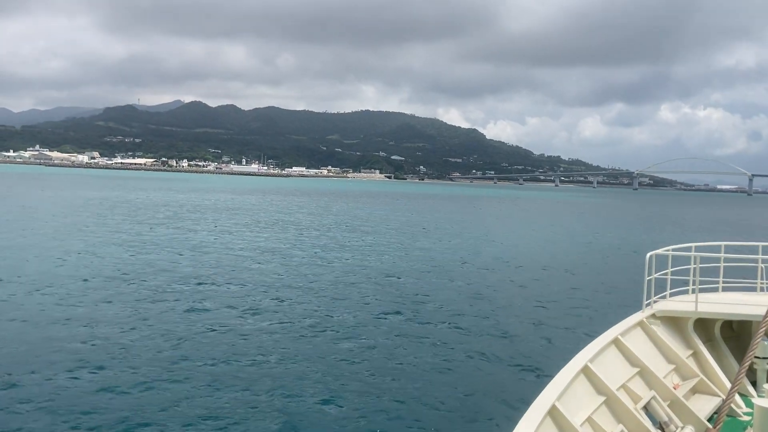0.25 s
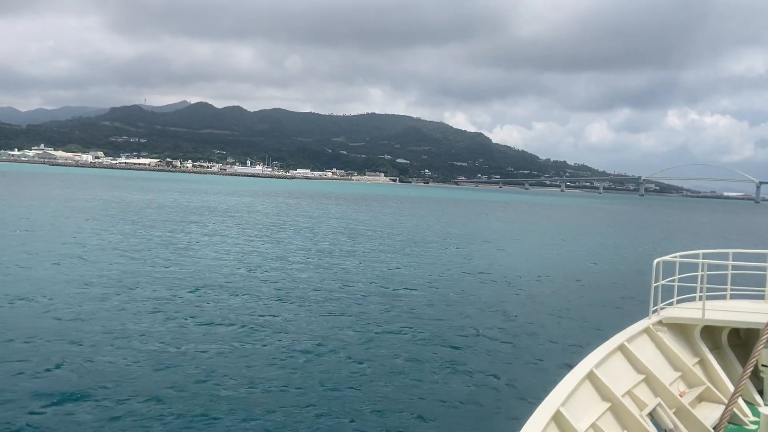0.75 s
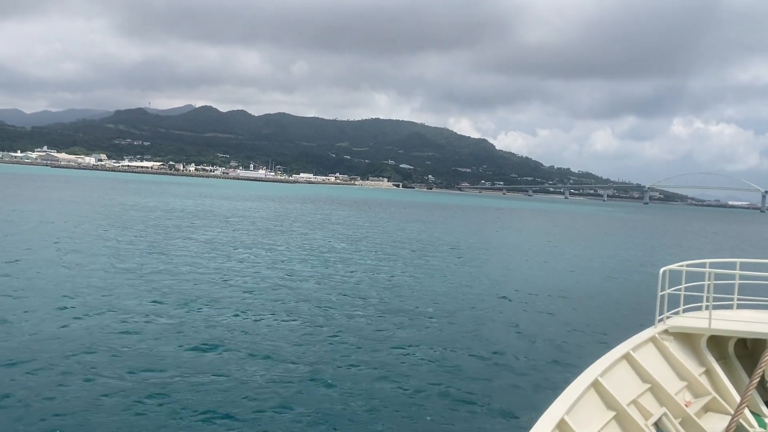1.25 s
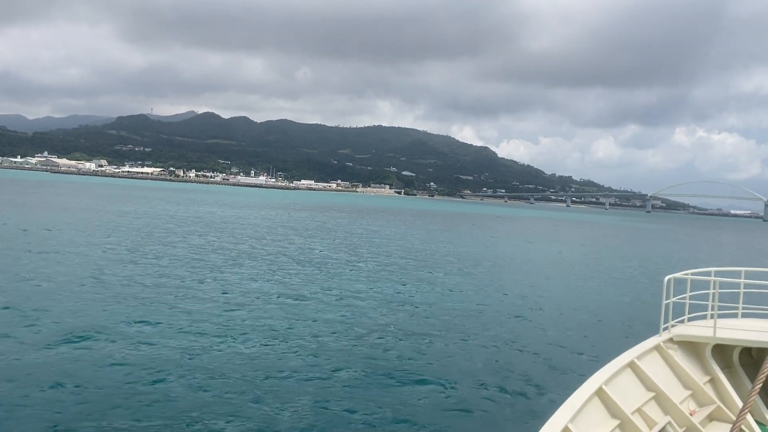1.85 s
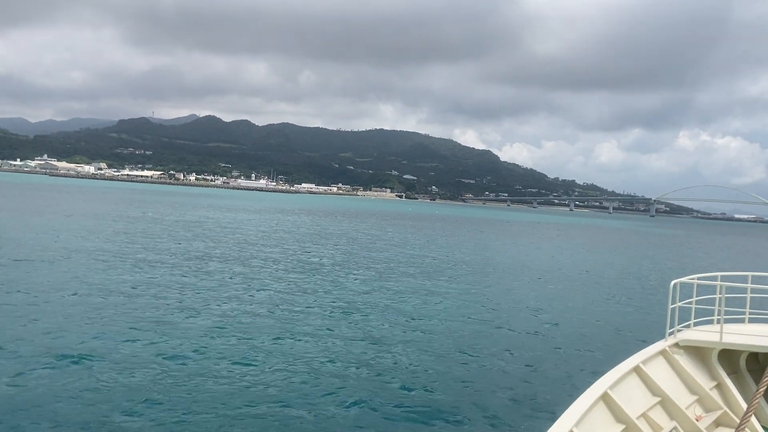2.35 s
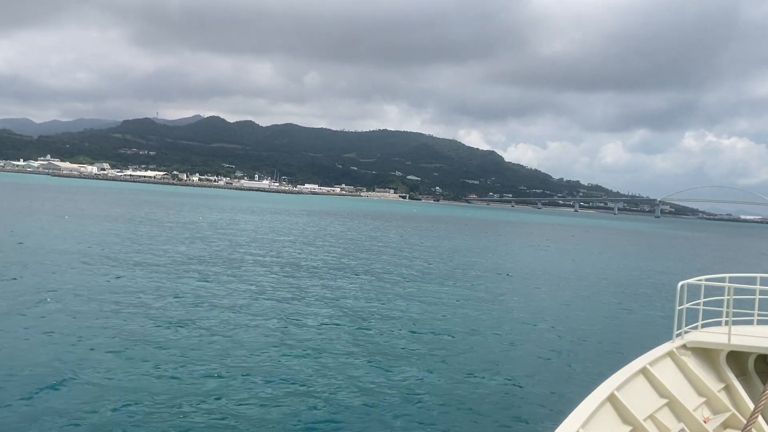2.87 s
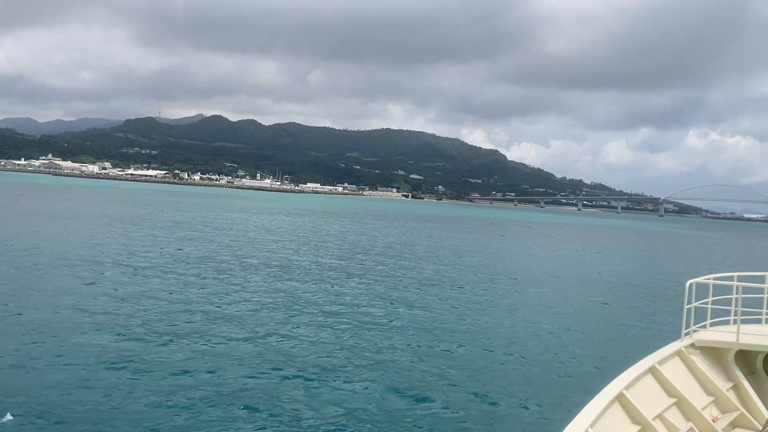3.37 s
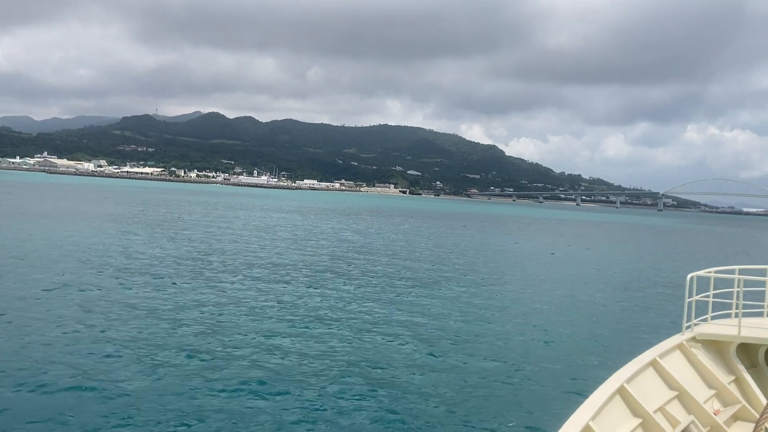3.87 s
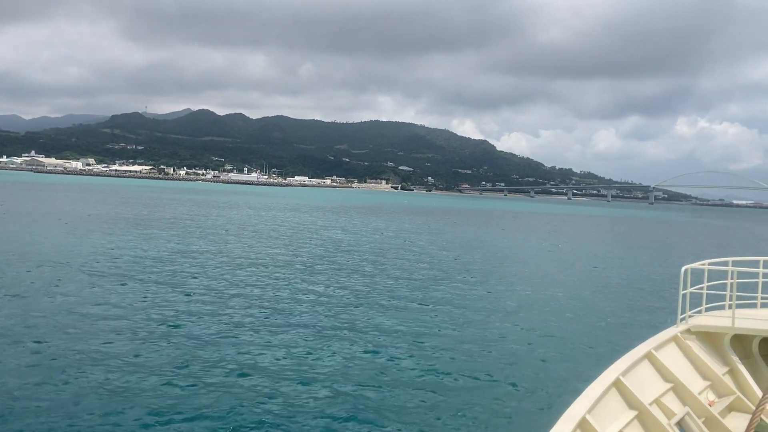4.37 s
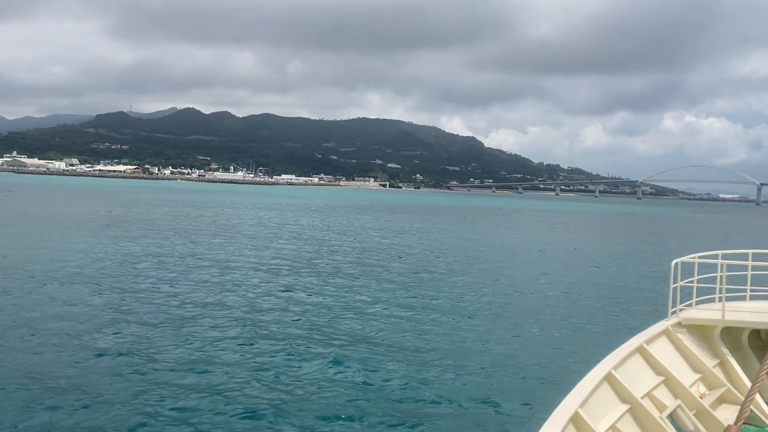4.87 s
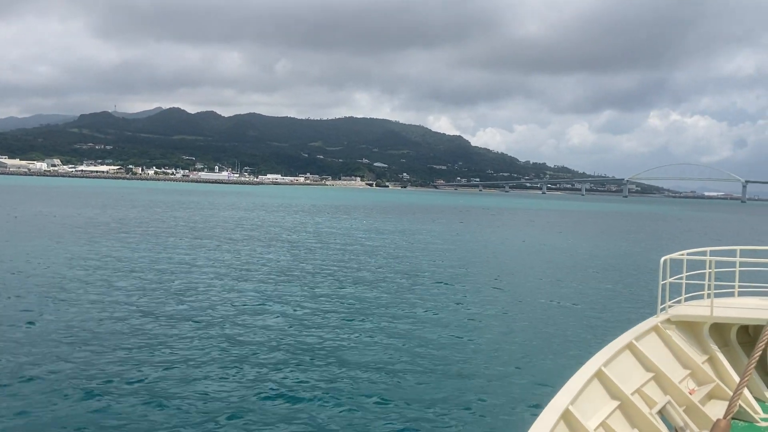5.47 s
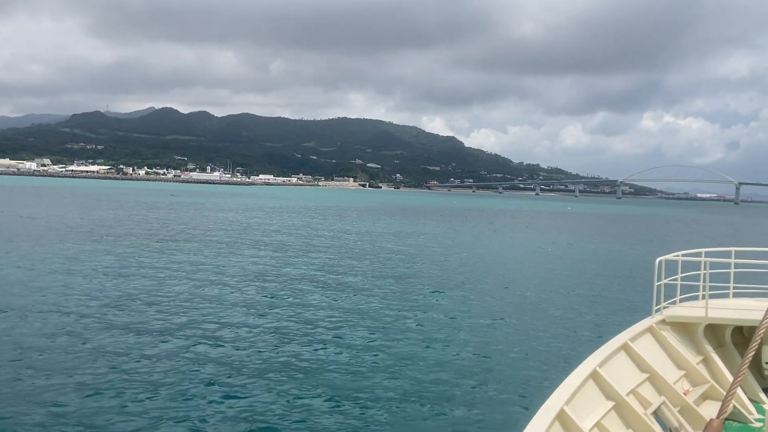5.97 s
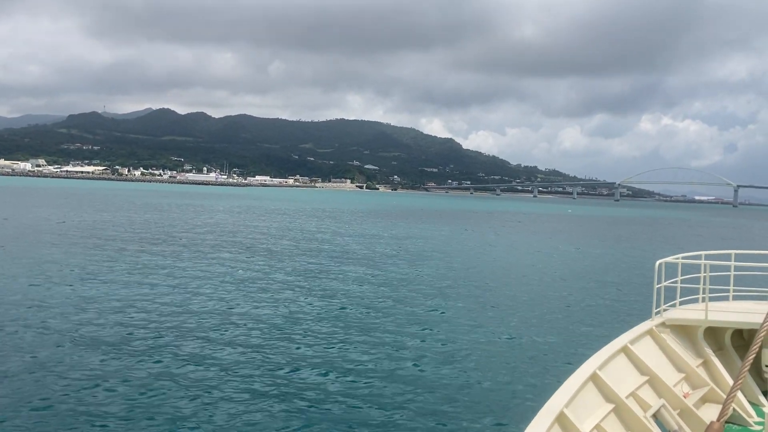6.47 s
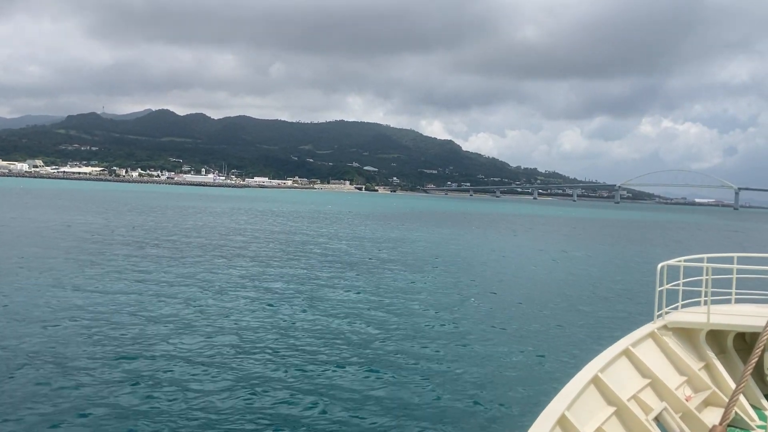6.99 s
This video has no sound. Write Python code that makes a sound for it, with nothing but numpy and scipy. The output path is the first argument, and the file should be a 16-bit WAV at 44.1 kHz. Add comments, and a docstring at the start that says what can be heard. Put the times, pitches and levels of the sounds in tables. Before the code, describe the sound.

Uneven wind roars, rasps and thumps against a phone's microphones on a ferry deck, over low ship drone and hissing sea.

```python
"""Wind blows unevenly across a phone's microphones on the deck of a moving ferry: noise, shaped in time and pitch.
Gusts roar and rasp at the ports, big eddies rumble and boom, and single buffets thump and crackle.
Underneath run the ship's steady drone, a dull rush with wavering sine tones,
and the swelling hiss of the sea, noise that follows a swell."""
import sys
import numpy as np
from scipy import signal
from scipy.fft import rfft, irfft
from scipy.io import wavfile
from scipy.ndimage import uniform_filter1d

SR = 44100
rng = np.random.default_rng(int(sys.argv[2]) if len(sys.argv) > 2 else 0)


def to_wav(sig):
    """Store sig (one row per channel, or 1-D mono) as 16-bit WAV at the path in sys.argv[1].

    Samples outside -1..1 are clipped; the rate is SR.
    """
    pcm = np.clip(np.atleast_2d(sig), -1, 1) * 32767
    pcm = np.round(pcm).astype(np.int16)
    wavfile.write(sys.argv[1], SR, pcm.T)  # frames by channels


N = 318843
TIME = np.arange(N) / SR  # s
FREQ = np.maximum(np.arange(N // 2 + 1) * SR / N, 1)  # Hz

# Relative noise spectra. Each row: frequency in Hz, density in dB.
SHIP_COLOUR = [(25, -5), (55, 7.5), (120, -4), (200, -13), (350, -7), (600, -13.5), (1000, -40),
               (1600, -35), (2500, -39), (5000, -90)]
WASH_COLOUR = [(600, -1.5), (1500, 5), (2200, 3.5), (3000, 2), (4300, 0), (5600, -4.5), (6300, -5),
               (7000, -58), (15000, -74)]
SPRAY_COLOUR = [(4000, -29), (6000, -11.5), (6900, -4), (9000, -4.5), (11500, -0.5), (13500, -0.5),
                (15500, -7)]
RUMBLE_COLOUR = [(22, -44), (31, -29), (45, -6.5), (65, 1), (120, -1.5), (180, -6.5), (280, -13.5),
                 (600, -26)]
TICK_COLOUR = [(800, -4), (1800, 0), (3200, -2), (4500, -6), (6000, -15)]
CRACKLE_COLOUR = [(800, -30), (1600, 10), (2400, -0.5), (4000, -12.5), (5500, -30), (7500, -37)]
GUST_COLOUR = [(60, -27), (140, -0.5), (230, 1), (380, 0.5), (560, -1), (720, -4.5), (1000, -26.5),
               (1600, -26), (3000, -70)]
RASP_COLOUR = [(350, -26), (650, 7), (850, 3.5), (1100, 3), (1450, -3), (1800, -5.5), (2300, -8),
               (3200, -24), (6000, -48)]

# Steady tones of the machinery. Each row: pitch in Hz, rms level in dB.
HUM = [(59.2, -37), (120, -51), (156, -45), (208, -45.5)]
# Swell of the sea along the hull. Each row: time in seconds, swell in dB.
SWELL = [(0.0, -51), (0.16, -51.5), (0.38, -53), (0.86, -49.5), (0.97, -54.5), (1.37, -57), (1.89, -50),
         (2.09, -52.5), (2.44, -48), (2.64, -53.5), (3.12, -53.5), (3.36, -50.5), (4.87, -51), (5.01, -46),
         (5.19, -52.5), (5.32, -47.5), (5.62, -47), (5.86, -53), (6.4, -48), (6.48, -46), (6.68, -45.5),
         (7.23, -48)]
# Water washing along the hull. Each row: time in seconds, level at the mean swell in dB.
WASH = [(0.0, -46), (1.3, -45.5), (2.4, -46.5), (3.6, -45), (4.4, -44.5), (4.9, -46.5), (6.2, -43.5),
        (7.23, -43)]
# Deep rumble between gusts. Each row: time in seconds, level in dB.
RUMBLE = [(0.0, -23.5), (0.45, -31), (1.4, -24.5), (2.3, -24.5), (2.8, -23.5), (3.7, -25), (5.1, -24.5),
          (6.75, -23.5), (7.23, -23.5)]
# Sharp cracks of air at the ports. Each row: time in seconds, level in dB, decay in seconds, upper edge in Hz.
SNAPS = [(0.004, -20, 0.0018, 2000), (0.0735, -30, .001, 3200), (1.171, -33.5, .0008, 5000),
         (1.291, -35, .0006, 5000), (2.603, -29, .002, 1900), (2.649, -28, .003, 2200),
         (2.6595, -29, 0.0022, 2500), (2.8197, -25, .0006, 4000), (2.8342, -17.5, 0.0024, 2150),
         (2.835, -32, 0.00055, 6500), (2.843, -23, 0.0022, 2300), (2.849, -25, 0.0024, 2000),
         (2.853, -26, 0.0018, 2300), (2.8695, -24.5, .003, 2470), (2.8765, -31, .002, 2500),
         (2.9305, -27, .002, 2200), (4.974, -25, .001, 2800), (5.692, -25.5, 0.0028, 1900),
         (5.705, -23, .003, 2100), (6.199, -24, 0.0022, 1700), (6.2046, -20, .0015, 2300),
         (6.2318, -21, .002, 1800), (6.238, -23, 0.0027, 2100), (6.682, -27, .0015, 3000),
         (6.8240, -15, .003, 1780), (6.8287, -16, .002, 1870)]
# Single eddies that hit the ports. Each row: time in seconds, roar in dB, thump in dB, crackle in dB.
BUFFETS = [(0.008, -12, -27, -39), (0.025, -14, -28, -34), (0.092, -15.5, -12, -50),
           (0.163, -13.5, -11.5, -40), (0.281, -14, -17, -39), (0.607, -19, -21, -56),
           (0.686, -21, -8, -52), (0.748, -17, -13, -54), (0.84, -16.5, -21, -51), (1.41, -17.5, -15, -40),
           (1.874, -24.5, -7.5, -46), (2.063, -24, -18, -61), (2.54, -21, -14, -50),
           (2.604, -10.5, -12, -34), (2.659, -19, -29, -35), (2.819, -16, -26, -38), (2.842, -12, -15, -41),
           (2.849, -15, -6.5, -40), (2.878, -8.5, -13.5, -36), (2.932, -12.5, -19, -35),
           (3.233, -28, -9, -39), (3.268, -17, -33, -42), (3.521, -20.5, -19, -35), (3.697, -18, -23, -50),
           (3.781, -15.5, -26, -44), (3.825, -13, -26, -40), (3.93, -12.5, -28, -54),
           (3.962, -18, -30, -46), (3.981, -11, -38, -43), (4.132, -21, -29, -48), (4.165, -21, -21, -53),
           (4.339, -18, -11, -39), (4.371, -17, -21, -44), (4.517, -12.5, -34, -50), (4.941, -7, -32, -37),
           (4.982, -13, -11.5, -37), (5.152, -12.5, -27, -43), (5.201, -8, -33, -33),
           (5.262, -26, -36, -38), (5.281, -29, -34, -28), (5.303, -18, -30, -33), (5.331, -20, -34, -33),
           (5.435, -12.5, -28, -39), (5.699, -12.5, -8, -29), (5.868, -15, -31, -35.5),
           (5.934, -17, -12.5, -38), (6.202, -14, -10, -38), (6.24, -19, -27, -32), (6.647, -17, -25, -35),
           (6.692, -19, -5, -37), (6.724, -17.5, -26, -39), (6.747, -30, -6, -37), (6.783, -28, -24, -33),
           (6.831, -9.5, -10, -42), (7.102, -20, -12, -36), (7.154, -16, -18, -39)]
# Big eddies that boom at the ports. Each row: start in seconds, hold in seconds, pitch in Hz, level in dB.
BOOMS = [(0.0, 0.11, 168, -18), (0.306, 0.023, 199, -19.5), (0.65, 0.032, 129, -24.5),
         (2.667, 0.054, 62, -20), (2.816, .055, 62, -17), (4.946, 0.06, 68, -26),
         (6.198, 0.075, 66.4, -18.5), (6.675, 0.115, 62, -23.5), (6.82, 0.023, 128, -12)]
# Air stream between gusts. Each row: time in seconds, strength against the usual in dB.
WIND = [(0.0, 8), (0.22, 1), (0.75, 3.5), (1.65, -3.5), (1.76, -9), (2.55, -7.5), (2.62, 4.5), (3.1, 4.5),
        (3.42, -3.5), (4.18, 6.5), (4.45, 9.5), (4.9, 4), (5.35, 7.5), (5.6, 1), (6.02, -1), (6.3, -5),
        (6.6, -3), (7.23, -1.5)]
# Gusts. Each row: start in seconds, hold in seconds, roar in dB, rasp against roar in dB.
GUSTS = [(0.0, 0.07, -22, -15), (0.095, 0.074, -23, -15), (0.258, 0.055, -24, -2), (0.44, 0.095, -23, -7),
         (0.598, 0.0092, -23.5, 3), (0.639, 0.067, -21.5, 1), (0.735, 0.013, -18, 2),
         (0.824, 0.018, -30, 2.5), (0.91, 0.023, -27.5, 1), (0.966, 0.044, -27.5, -4.5),
         (1.365, 0.028, -30, 1.5), (2.587, 0.045, -19, -19), (2.64, 0.029, -16.5, -8),
         (2.692, 0.051, -24.5, 3.5), (2.78, 0.02, -14.5, -14), (2.834, 0.077, -18.5, -2),
         (2.982, 0.097, -22, 1.5), (3.09, 0.061, -21, -6.5), (3.222, 0.074, -23.5, -3.5),
         (3.608, 0.042, -22, 0.5), (3.772, 0.044, -38, 1), (3.912, 0.069, -25, 3.5),
         (4.031, 0.036, -21, -5), (4.113, 0.051, -17, -11), (4.263, 0.073, -22, -4), (4.36, 0.057, -21, -6),
         (4.637, 0.038, -30, 3), (4.779, 0.053, -31, 7.5), (4.934, 0.13, -22.5, 0.5),
         (5.133, 0.099, -24, 5.5), (5.242, 0.096, -21, -1), (5.38, .012, -26.5, 1),
         (5.439, 0.049, -20.5, -8), (5.67, 0.012, -17, -7), (5.684, 0.015, -18.5, -0.5),
         (5.815, 0.06, -21.5, -6), (6.187, 0.023, -15.5, -6), (6.23, 0.0098, -21.5, 6.5),
         (6.63, 0.03, -16, -11), (6.675, 0.12, -20.5, -7.5), (6.795, 0.05, -18, -11),
         (7.034, 0.069, -22.5, -6.5)]
# Brief lulls between gusts. Each row: middle in seconds, length in seconds, gain change in dB.
LULLS = [(0.216, 0.051, 0.5), (0.397, 0.05, -3.5), (0.576, 0.046, -7), (0.761, 0.037, -5.5),
         (0.881, 0.03, -7), (1.082, 0.047, -5.5), (1.222, 0.069, -4.5), (2.58, 0.014, -4),
         (2.762, 0.034, -6.5), (2.806, 0.015, -7), (2.955, 0.03, -4.5), (3.385, 0.044, -5.5),
         (3.755, 0.029, -6), (3.81, .022, -3), (3.945, 0.019, -5), (4.103, .022, -1), (4.184, 0.034, -17),
         (4.247, 0.02, -2.5), (4.91, 0.042, -6), (5.137, 0.029, -6), (5.41, 0.039, -4),
         (5.587, 0.087, -5.5), (5.665, 0.014, -5), (5.774, .07, -5)]
# Upper edge of the turbulence. Each row: time in seconds, edge in Hz.
EDGE = [(0, 1660), (0.55, 1450), (0.8, 1520), (0.98, 1790), (2.6, 1640), (2.72, 1770), (2.93, 1750),
        (3.0, 1310), (3.07, 1520), (3.15, 1800), (3.3, 1620), (3.62, 1330), (3.8, 1560), (3.95, 1370),
        (4.28, 1330), (4.45, 1880), (4.6, 1380), (4.78, 1340), (4.95, 1740), (5.15, 1610), (5.3, 1780),
        (5.5, 1580), (5.7, 1660), (6.79, 1570), (7.23, 1550)]
# Right channel against left. Each row: frequency in Hz, phase lag in radians, likeness 0-1, left minus right in dB.
PORTS = [(190, 0.14, 0.91, 0.5), (294, 2.84, 0.79, 1), (401, 4.63, 0.62, -0.5), (516, 5.83, 0.75, -1),
         (744, 9.63, 0.86, 0), (1004, 12.97, 0.53, 2), (1148, 15.17, 0.8, 3), (1266, 17.95, 0.42, 2),
         (1590, 20.06, 0.87, 2.5), (2020, 19.2, 0.11, 0), (4300, 31, 0.1, 0), (5450, 17, 0.47, -2.5)]
# Crossover below which the channels merge. Each row: time in seconds, crossover in Hz.
MONO_BELOW = [(0, 535), (2, 600), (3.7, 560), (4.1, 404), (4.5, 282), (5, 204), (5.9, 157), (6.4, 223),
              (6.8, 393), (7.2, 415)]

WASH_GROWTH = 0.43  # dB per dB of swell
SPRAY_DB, SPRAY_LAG_MS = 4.5, .2233  # level against the swell; lag of the left channel
TICK_GROWTH = 0.3  # dB per dB of rasp
BUFFET_RASP_DB = -10.5  # against its roar
ROAR_DB, ROAR_GROWTH = -27.5, 0.79  # at usual wind; dB per dB of wind
RASP_DB, RASP_GROWTH = -31, 1  # likewise
GUST_ATTACK_S, GUST_RELEASE_S = 0.0071, 0.0086
GUST_RUMBLE_DB = -6  # against the gust's roar
DEEP_HZ, DEEP_SHIFT = 406, 0.27  # split of the roar; exponent of its tilt with dullness
TOP_HZ = 15800


def undb(db):
    """Decibels to gain."""
    return 10 ** (np.asarray(db) / 20)


def curves(table):
    """The columns of a time table, sample by sample."""
    s, *columns = np.transpose(table)
    return [np.interp(TIME, s, c) for c in columns]


def spectra(table):
    """The columns of a frequency table, bin by bin, on a log frequency axis."""
    hz, *columns = np.transpose(table)
    return [np.interp(np.log(FREQ), np.log(hz), c) for c in columns]


def noise(colour):
    """Two unrelated noises of rms 1 with this spectrum, falling steeply beyond its ends."""
    skirts = np.minimum(FREQ / colour[0][0], 1) ** 3 * np.minimum(colour[-1][0] / FREQ, 1) ** 3
    spectrum = rfft(rng.standard_normal((2, N))) * undb(spectra(colour)[0]) * skirts
    x = irfft(spectrum, N)
    return x / x.std()


def flutter(rate_hz, depth_db):
    """A gain of mean power 1 that wanders at random, mostly slower than half the rate."""
    wander = irfft(rfft(rng.standard_normal(N)) / (1 + (2 * FREQ / rate_hz) ** 4), N)
    gain = undb(depth_db * np.clip(wander / wander.std(), -2.5, 2.5))
    return gain / np.sqrt(np.mean(gain ** 2))


def puff(age_s, rise_s, fall_s):
    """An envelope that swells to 1 at age 0 and dies away exponentially."""
    return np.exp(-np.where(age_s < 0, (age_s / rise_s) ** 2, age_s / fall_s))


def surge(start_s, hold_s):
    """The envelope of a gust: quick attack, hold, release."""
    age_s = TIME - start_s
    attack = np.clip(age_s / GUST_ATTACK_S + .5, 0, 1)
    return attack * np.exp(-np.clip((age_s - hold_s) / GUST_RELEASE_S, 0, 20))


def burst(envelope, low_hz, high_hz):
    """Two unrelated bursts of noise between these edges, each with the energy of the envelope."""
    sos = signal.butter(2, [low_hz, high_hz], "band", fs=SR, output="sos")
    x = signal.sosfilt(sos, rng.standard_normal((2, N)) * (envelope + 1e-12))
    return x * np.sqrt(np.sum(envelope ** 2) / np.sum(x ** 2, axis=1, keepdims=True))


def churn(colour, size=600):
    """Turbulent noise whose strength stays even from one hundredth of a second to the next."""
    x = noise(colour)
    power = uniform_filter1d(uniform_filter1d(x ** 2, size), size // 2)
    return x / np.sqrt(power)


def turbulence(x, clump_db=3.0, above_db=-16, size=512):
    """Eddies gather in short clumps of pitch; above a moving edge the sound drops to a lower shelf."""
    hz, s, cells = signal.stft(x, SR, nperseg=size)
    below = 1 / (1 + (hz[:, None] / np.interp(s, *np.transpose(EDGE))) ** 10)
    # smoothed over neighbouring pitches, then times
    clumps = uniform_filter1d(rng.standard_normal(cells.shape), size=3, axis=0)
    clumps = uniform_filter1d(clumps, size=4, axis=1)
    clumps = undb(clump_db * clumps / clumps.std())
    gain = (below + undb(above_db) * (1 - below)) * clumps / np.sqrt(np.mean(clumps ** 2))
    return signal.istft(cells * gain, SR, nperseg=size)[1][:, :N]


def ship():
    """Engines and ventilation: a dull even rush with a few wavering tones."""
    hum = np.zeros(N)
    for hz, db in HUM:
        tone = np.sqrt(2) * np.sin(2 * np.pi * (hz * TIME + rng.random()))
        hum += undb(db) * flutter(rate_hz=5.4, depth_db=2.5) * tone
    return noise(SHIP_COLOUR) * undb(-31.0) + hum


def sea():
    """Water washes along the hull, and its foam hisses in the same slow swells; returns wash and spray."""
    (wash_db,), (swell_db,) = curves(WASH), curves(SWELL)
    wash_gain = undb(wash_db + WASH_GROWTH * (swell_db - swell_db.mean()))
    wash = noise(WASH_COLOUR) * wash_gain * flutter(rate_hz=56, depth_db=1.18)
    spray = noise(SPRAY_COLOUR)[0] * undb(swell_db + SPRAY_DB)
    spray = spray * flutter(rate_hz=220, depth_db=0.5) * flutter(rate_hz=14, depth_db=0.75)
    # spray reaches the left channel later and with opposite sign
    late = -irfft(rfft(spray) * np.exp(-2j * np.pi * FREQ * SPRAY_LAG_MS / 1000), N)
    return wash, np.array([late, spray])


def rumble(gain):
    """Large slow eddies press on the microphones."""
    return noise(RUMBLE_COLOUR) * gain * flutter(rate_hz=22, depth_db=1.0)


def ticks(rasp_gain, count=260, tick_s=0.001, tick_db=-38):
    """The smallest eddies break at the ports in faint ticks, a little louder where the rasp is strong."""
    hits = np.zeros(N)
    hits[(rng.random(count) * N).astype(int)] = undb(tick_db)
    envelope = signal.lfilter([1], [1, -np.exp(-1 / (tick_s * SR))], hits)
    return noise(TICK_COLOUR) * envelope * (rasp_gain / np.median(rasp_gain)) ** TICK_GROWTH


def snaps(low_hz=600):
    """The hardest eddies break on a port with a dry crack: a very short burst of noise."""
    return sum(undb(db) * burst(puff(TIME - s, rise_s=0.0004, fall_s=decay_s), low_hz, edge_hz)
               for s, db, decay_s, edge_hz in SNAPS)


def buffets(thump_hz=110, thump_s=0.0059, snap_ahead_s=0.0025):
    """Each strong eddy crackles, rasps and roars for a moment and leaves one swing of pressure."""
    roar, crackle, thump = np.zeros((3, N))
    for s, roar_db, thump_db, crackle_db in BUFFETS:
        octaves, turn = rng.random(2) - [.5, 0]
        near = np.abs(TIME - s) < .12
        age_s = TIME[near] - s
        roar[near] += undb(roar_db) * puff(age_s, rise_s=0.0068, fall_s=0.0064)
        # the crackle peaks just ahead of the roar
        crackle[near] += undb(crackle_db) * puff(age_s + snap_ahead_s, rise_s=0.009, fall_s=0.015)
        swing = np.sin(2 * np.pi * (thump_hz * 2 ** octaves * age_s + turn))
        thump[near] += undb(thump_db) * np.exp(-(age_s / thump_s) ** 2) * swing
    crackle = crackle * flutter(rate_hz=700, depth_db=3.0)
    air = turbulence(churn(GUST_COLOUR) + undb(BUFFET_RASP_DB) * churn(RASP_COLOUR))
    return thump + roar * air + crackle * churn(CRACKLE_COLOUR)


def booms(spread=1.64, lead_s=0.003):
    """A big eddy makes the air at the ports boom: a surge of noise in a band around one pitch."""
    return sum(undb(db) * burst(surge(start_s - lead_s, hold_s), hz / spread, hz * spread)
               for start_s, hold_s, hz, db in BOOMS)


def lulls():
    """The gain of the air stream, which changes for a moment in each lull, nearly always downwards."""
    gain_db = np.zeros(N)
    for s, length_s, change_db in LULLS:
        gain_db += change_db * np.exp(-np.minimum(np.abs(2 * (TIME - s) / length_s), 10) ** 4)
    return undb(gain_db)


def airflow():
    """Gusts add power to the wandering stream and lulls scale it; returns gains of rumble, roar and rasp."""
    (wind_db,), (rumble_db,) = curves(WIND), curves(RUMBLE)
    eddying = flutter(rate_hz=20, depth_db=0.68)
    # powers, so that gusts add without regard to phase
    low = (undb(rumble_db) * flutter(rate_hz=25.0, depth_db=0.3)) ** 2
    roar = (undb(ROAR_DB + ROAR_GROWTH * wind_db) * eddying) ** 2
    rasp = (undb(RASP_DB + RASP_GROWTH * wind_db) * eddying) ** 2
    for start_s, hold_s, roar_db, bright_db in GUSTS:
        power = (undb(roar_db) * surge(start_s, hold_s)) ** 2
        low = low + power * undb(GUST_RUMBLE_DB) ** 2
        roar = roar + power
        rasp = rasp + power * undb(bright_db) ** 2
    calm = lulls()
    return np.sqrt(low), np.sqrt(roar) * calm, np.sqrt(rasp) * calm


def gusts(roar_gain, rasp_gain):
    """Air roars and rasps at the ports; the same eddies chop both, and dull air roars deeper."""
    eddies = flutter(rate_hz=126, depth_db=1.24)
    stream = churn(GUST_COLOUR)
    deep = irfft(rfft(stream) / (1 + (FREQ / DEEP_HZ) ** 6), N)
    dullness = roar_gain / rasp_gain
    lean = (dullness / np.median(dullness)) ** DEEP_SHIFT
    tilted = deep * lean + (stream - deep) / lean
    roar = tilted * roar_gain * flutter(rate_hz=370, depth_db=2.0)
    rasp = churn(RASP_COLOUR) * rasp_gain * flutter(rate_hz=620, depth_db=2.0)
    return turbulence(eddies * (roar + rasp))


def ports(pair):
    """The right channel hears a lagging share of the left one's sound, plus sound of its own."""
    lag_rad, likeness, left_db = spectra(PORTS)
    likeness = np.clip(likeness, 0, 1)
    left, own = rfft(pair)
    right = likeness * np.exp(-1j * lag_rad) * left + np.sqrt(1 - likeness ** 2) * own
    return irfft(np.array([left * undb(left_db / 2), right * undb(-left_db / 2)]), N)


def scene():
    """Wind, ship and sea at the two microphones."""
    low, roar, rasp = airflow()
    wash, spray = sea()
    background = ship() + wash
    wind = rumble(low) + ticks(rasp) + snaps() + buffets() + booms() + gusts(roar, rasp)
    return ports(background + wind) + spray


def mono_bass(x, size=1024):
    """Below a moving crossover the right channel follows the left."""
    hz, s, (left, right) = signal.stft(x, SR, nperseg=size)
    crossover_hz = np.interp(s, *np.transpose(MONO_BELOW))
    shared = 1 / (1 + (hz[:, None] / crossover_hz) ** 8)
    # the divisor makes up the level where the two mix
    right = (shared * left + (1 - shared) * right) / np.sqrt(1 - shared * (1 - shared))
    return signal.istft(np.array([left, right]), SR, nperseg=size)[1][:, :N]


def record(dry, low_cut_hz=33):
    """The phone centres the bass, trims its bottom, rounds the highest peaks and cuts the top."""
    high_pass = signal.butter(4, low_cut_hz, "high", fs=SR, output="sos")
    x = signal.sosfilt(high_pass, mono_bass(dry))
    x = x / (1 + (x / .9) ** 6) ** (1 / 6)
    return signal.sosfilt(signal.ellip(10, .2, 80, TOP_HZ, fs=SR, output="sos"), x)


dry = scene()
out = record(dry)
to_wav(out)
```